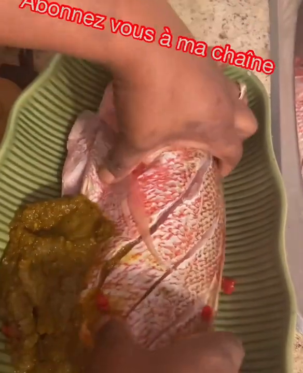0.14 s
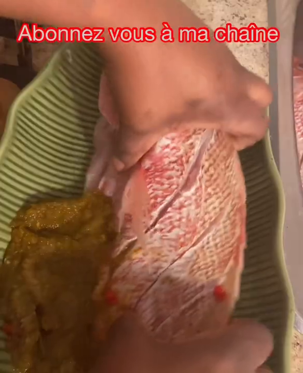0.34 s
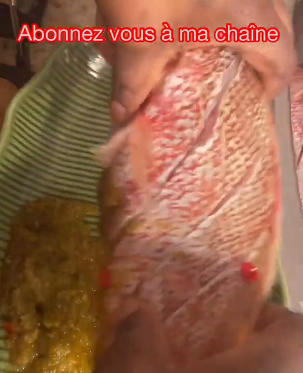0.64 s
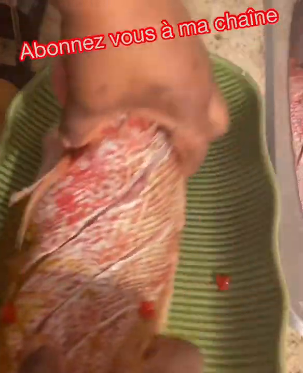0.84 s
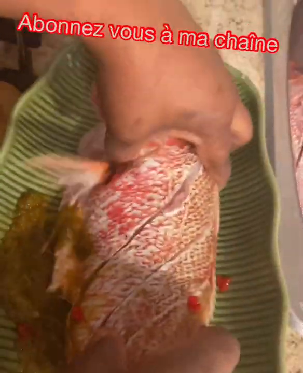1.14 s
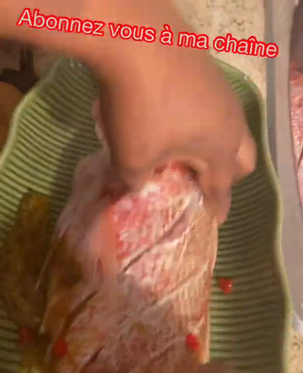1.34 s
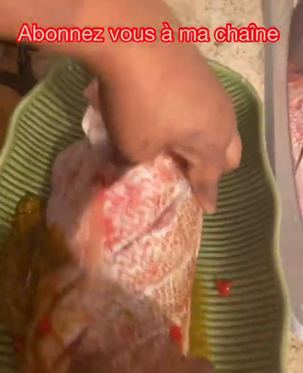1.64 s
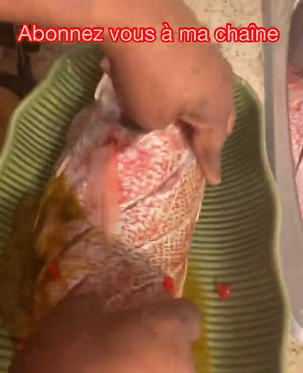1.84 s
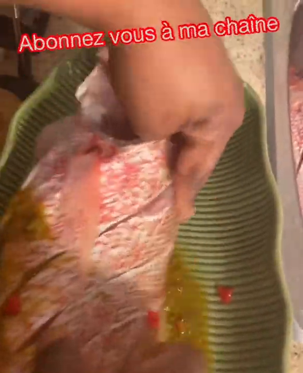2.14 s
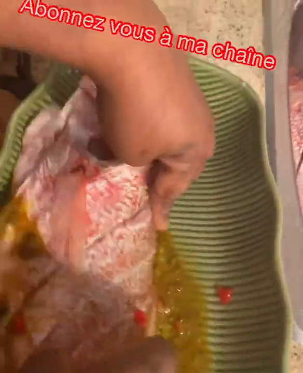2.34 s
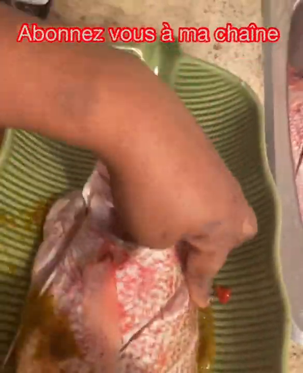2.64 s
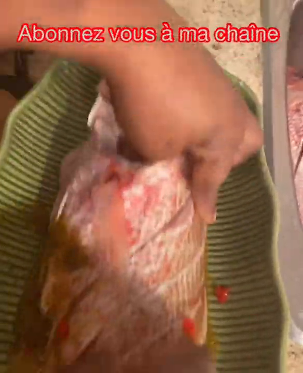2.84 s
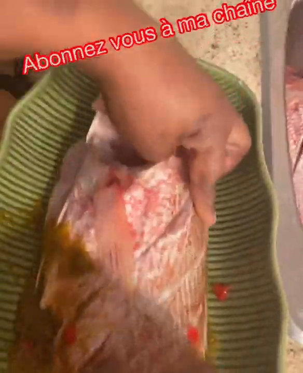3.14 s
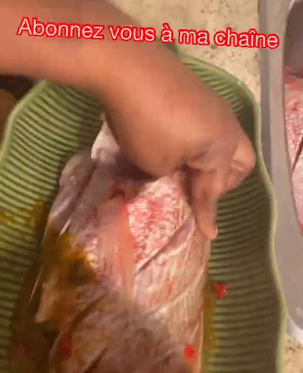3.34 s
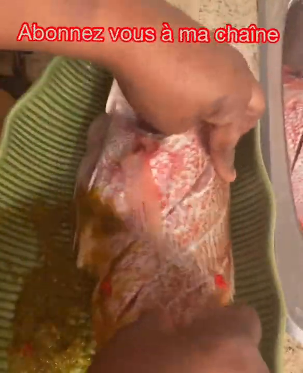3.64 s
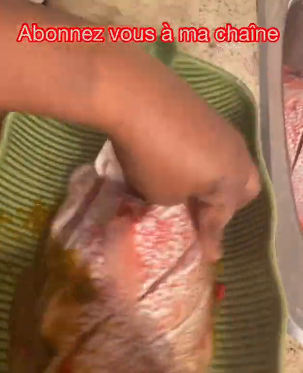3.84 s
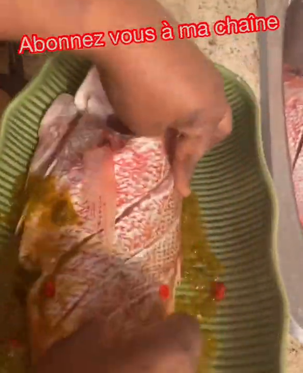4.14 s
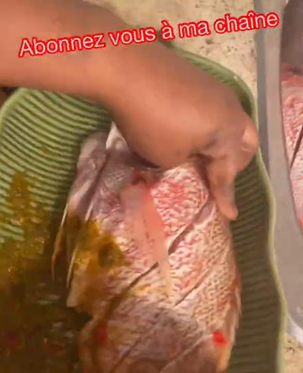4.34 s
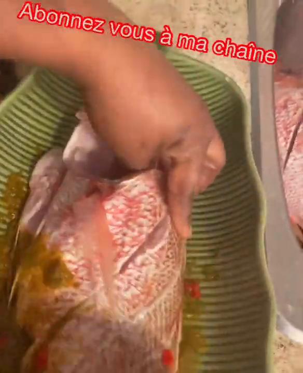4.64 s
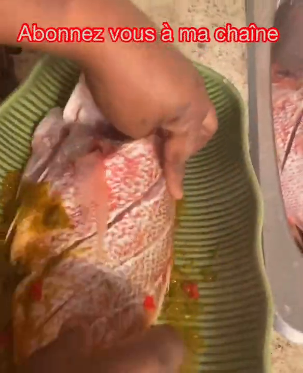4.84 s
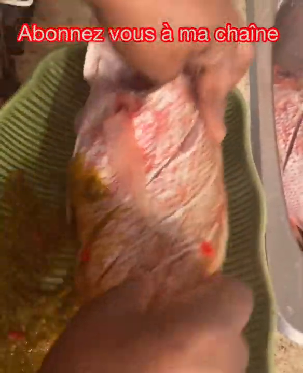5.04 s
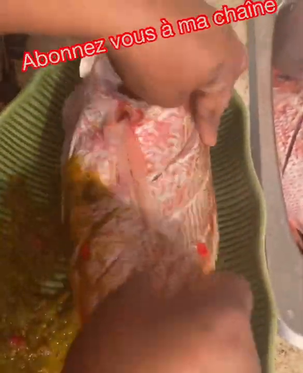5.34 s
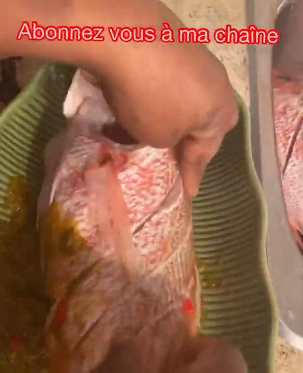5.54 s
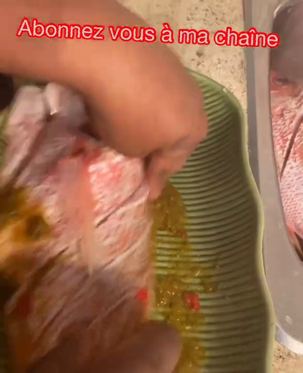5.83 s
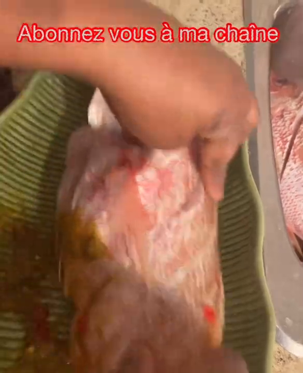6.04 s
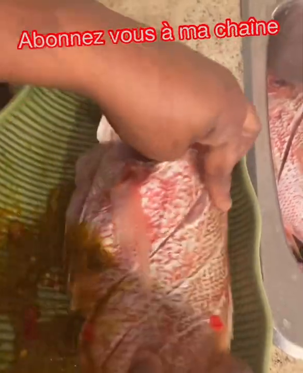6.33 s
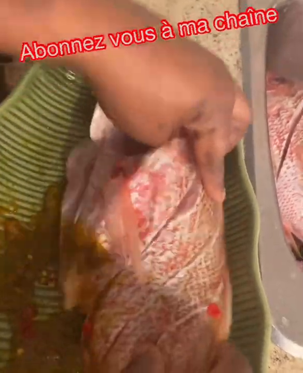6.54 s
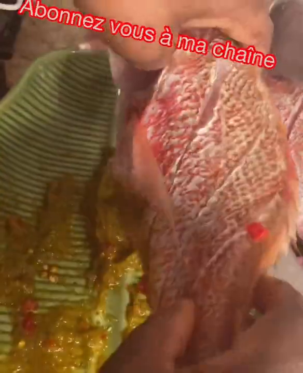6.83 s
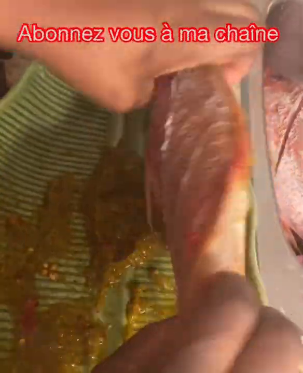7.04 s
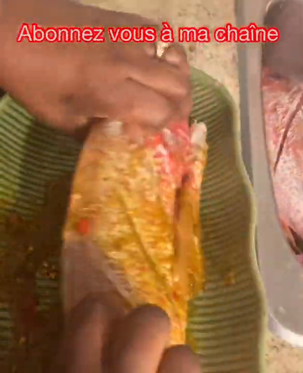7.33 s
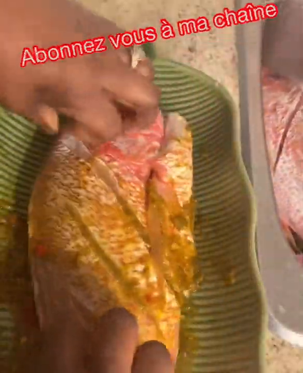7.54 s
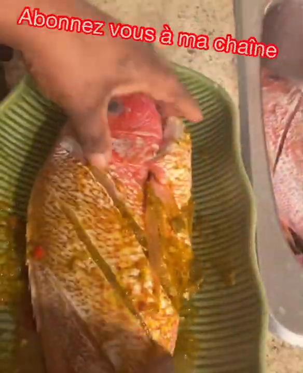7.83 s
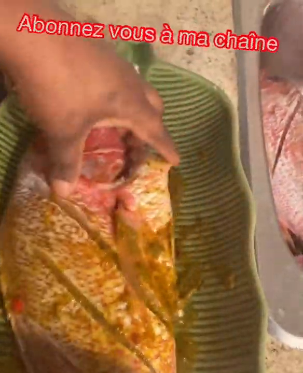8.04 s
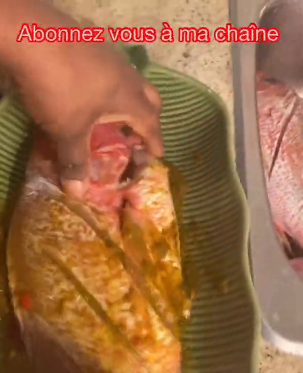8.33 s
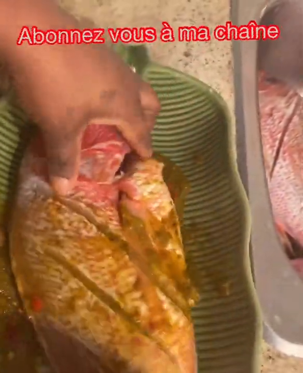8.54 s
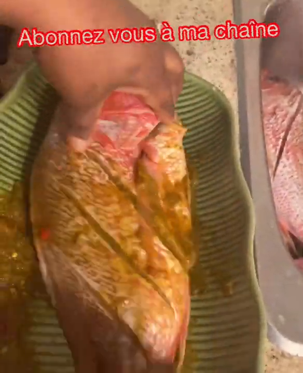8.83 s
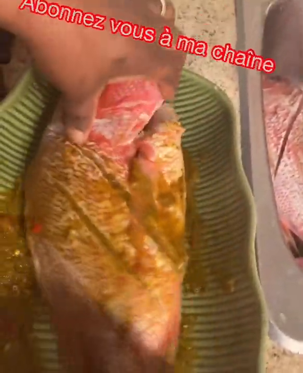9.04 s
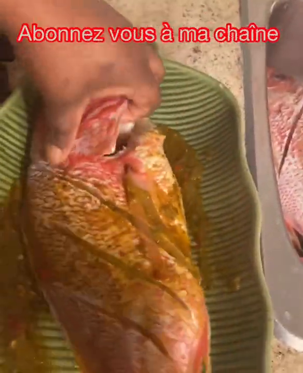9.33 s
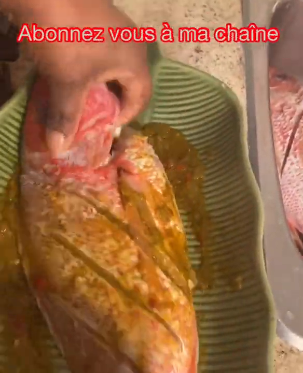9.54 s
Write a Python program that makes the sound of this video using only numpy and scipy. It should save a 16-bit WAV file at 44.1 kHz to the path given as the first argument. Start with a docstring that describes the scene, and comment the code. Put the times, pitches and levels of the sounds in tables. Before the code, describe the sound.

Close wet smacks and tiny rising pops of sticky paste, a few soft heavy thuds on a tray, over faint steady appliance hum.

```python
"""Raw fish pressed into seasoning paste

Hands press a scored fish into wet paste on a ribbed plastic tray in a kitchen. Air pockets pop as
short rising rings with noise bursts; peeling, sliding and squelching are clicks and noise through
resonances. Thuds ring the tray; steady tones hum over a dull noise rumble. Two close microphone ports
hear it all, with near echoes and a kitchen tail."""
import sys
import numpy as np
from scipy import signal
from scipy.fft import rfft, irfft, next_fast_len
from scipy.io import wavfile

SR = 44100
rng = np.random.default_rng(int(sys.argv[2]) if len(sys.argv) > 2 else 0)


def to_wav(sig):
    """Store sig (one row per channel, or 1-D mono) as 16-bit WAV at the path in sys.argv[1].

    Samples outside -1..1 are clipped; the rate is SR.
    """
    pcm = np.clip(np.atleast_2d(sig), -1, 1) * 32767
    pcm = np.round(pcm).astype(np.int16)
    wavfile.write(sys.argv[1], SR, pcm.T)  # frames by channels


N = 426447
SIZE = next_fast_len(N + SR)
HZ = np.arange(SIZE // 2 + 1) * SR / SIZE + 1e-3   # offset keeps log and division finite

# Patches of paste peeling off the tray. Each row: start in seconds, relative level in dB,
# length in seconds, brightness in dB per octave, level of the sizzle left behind in dB.
PEELS = [(1.306, -35.5, 0.033, 1, -68), (1.759, -36.5, 0.046, 0.5, -61), (1.87, -50.5, 0.021, -2, -60.5),
         (2.15, -37, 0.052, -4.5, -56), (2.517, -51, 0.067, -6, -91), (2.85, -52.5, 0.032, 4.5, -68),
         (3.728, -54, 0.056, -1, -81), (4.237, -20.5, 0.011, -3, -65), (4.391, -38.5, 0.024, -3.5, -62),
         (4.463, -39, 0.043, -5, -69), (5.12, -37, 0.031, -0.5, -69), (5.32, -39.5, 0.047, -6, -64),
         (5.335, -17, 0.017, 0.5, -44.5), (5.645, -30.5, 0.061, -0.5, -42.5), (6.023, -47.5, 0.14, 2, -50),
         (6.052, -45, 0.0058, -4.5, -57), (6.342, -34.5, 0.037, -3.5, -47), (7.517, -56, 0.068, -13, -96), ]


def from_db(db):
    """Decibels to an amplitude factor."""
    return 10 ** (np.asarray(db) / 20)


def rms_one(x):
    """Scales to unit rms."""
    return x / np.sqrt(np.mean(x ** 2) + 1e-20)


def at_hz(points, hz):
    """Interpolates (Hz, value) rows over log frequency."""
    points = np.array(points)
    return np.interp(np.log(hz), np.log(points[:, 0]), points[:, 1])


def add(out, start_s, piece):
    """Mixes a short sound in at a time."""
    i = round(start_s * SR)
    out[i:i + len(piece)] += piece[:N - i]


def band_filter(order, low_hz, high_hz):
    """Butterworth band-pass sections."""
    return signal.butter(order, [low_hz, high_hz], "band", fs=SR, output="sos")


def drift(rate_hz):
    """Slow random curve of unit rms: low-passed noise, computed every 40 samples."""
    r = np.exp(-80 * np.pi * rate_hz / SR)
    noise = rng.standard_normal(N // 40 + 2002)
    slow = signal.lfilter([1], [1, -2 * r, r * r], noise)[2000:]   # drops the filter's start-up
    return np.interp(np.arange(N) / 40, np.arange(len(slow)), rms_one(slow))


def ring(clicks, hz, t60_s):
    """Two-pole resonance: a unit click starts a decaying sine of height 1."""
    r = from_db(-60 / (t60_s * SR))
    w = 2 * np.pi * hz / SR
    return signal.lfilter([0, np.sin(w)], [1, -2 * r * np.cos(w), r * r], clicks + 1e-18)


def chance_clicks(per_s, spread_db):
    """Clicks at random moments, sizes of a long-tailed spread; mean power about 1."""
    sizes_db = spread_db * np.minimum(rng.exponential(1, N), 5)
    sizes = rms_one(from_db(sizes_db) * rng.choice([-1, 1], N))
    return sizes * (rng.random(N) < per_s / SR) * np.sqrt(SR / per_s)


def snaps(clicks, tilt_db, cycles, patchy_db, low_hz):
    """Clicks are dealt to pockets of 18 pitches; each swells and rings, and like sizes come and go together.

    tilt_db is in dB per octave."""
    pitches_hz = np.geomspace(low_hz, 15000, 18)
    dealt = rng.integers(0, 18, N)
    patches = [drift(19) for _ in range(6)]
    out = 0
    for k, hz in enumerate(pitches_hz):
        t60_s = cycles / hz
        once = ring(clicks * (dealt == k), hz, t60_s)
        pocket = ring(once, hz, t60_s) * (hz / cycles / SR) ** 1.461   # second ring gives the swell
        level_db = tilt_db * np.log2(hz / 4000) + patchy_db * patches[k // 3] + 30.5
        out = out + from_db(level_db) * pocket
    return out


def diffuse(pair):
    """Two unrelated spectra become left and right, with a set correlation at each pitch."""
    # Each row: frequency in Hz, left-right correlation from 0 to 1.
    likeness = [(60, 0.93), (250, 0.82), (600, 0.037), (2000, 0.4), (5000, 0.16), (10000, 0.88)]
    alike = np.clip(at_hz(likeness, HZ), 0, 1)
    common = np.sqrt(1 + alike) * pair[0]
    opposed = np.sqrt(1 - alike) * pair[1] * [[1], [-1]]
    return irfft((common + opposed) / np.sqrt(2), SIZE)[:, :N]


def rumble():
    """Steady room noise, heavy in the bass."""
    # Spectrum shape. Each row: frequency in Hz, relative density in dB.
    spectrum = [(15, -46), (25, 6), (118, -10.5), (167, -8.5), (368, -12.5), (651, -23), (1930, -37),
                (2460, -47.5), (7110, -65), (9080, -58.5), (10700, -53.5), (13300, -62), (15200, -47),
                (16500, -77.5)]
    noise = rfft(rng.standard_normal((2, SIZE))) * from_db(at_hz(spectrum, HZ))
    return from_db(-46.5) * rms_one(diffuse(noise))


def hum(waver_db, waver_hz):
    """Appliance motor tones that waver a little in level and pitch."""
    # Each row: frequency in Hz, rms level in dB, both before waver.
    tones = [(59.2, -52.5), (86.1, -52.5), (118.4, -48.5), (355.3, -64)]
    out = 0
    for hz, db in tones:
        level = np.sqrt(2) * from_db(db + waver_db * drift(2.9))
        cycles = np.cumsum(hz + waver_hz * drift(3.07)) / SR
        out = out + level * np.sin(2 * np.pi * cycles)
    return out


def kitchen(x, gap_s):
    """Echo tail: noise in octave bands, each with its own decay, from the first wall echo on."""
    # Each row: frequency in Hz, decay time t60 in seconds.
    room_t60 = [(100, 0.52), (1000, 0.26), (4000, 0.21), (12000, 0.14)]
    t = np.arange(SR // 2) / SR
    tail = 0
    white = rng.standard_normal((2, len(t)))
    for low_hz in 60 * 2. ** np.arange(8):
        octave = signal.sosfilt(band_filter(2, low_hz, 2 * low_hz), white)
        tail = tail + octave * from_db(-60 * t / at_hz(room_t60, low_hz * np.sqrt(2)))
    tail = tail * (t > gap_s) / np.sqrt(np.sum(tail ** 2) / 2)
    return diffuse(rfft(tail, SIZE) * rfft(x, SIZE))


def near_echoes(x, level_db, t60_s):
    """Hands and tray ribs throw back brief dense echoes, opposite in sign at the two ports."""
    t = np.arange(SR // 30) / SR
    echoes = rng.standard_normal(len(t)) * from_db(-60 * t / t60_s)
    echoes = signal.sosfilt(band_filter(3, 450, 6000), echoes)
    echoes = from_db(level_db) * echoes / np.sqrt(np.sum(echoes ** 2))
    return signal.fftconvolve(echoes, x)[:N] * [[1], [-1]]


def scrapes():
    """Slow strokes of skin over the ribs: lumpy band noise that swells, climbs in pitch and fades."""
    # Each row: start in seconds, level in dB, starting centre in Hz, length in seconds.
    strokes = [(8.241, -65, 2260, 0.22), (8.508, -68, 2400, 0.2)]
    climb, grain_db = 0.3, 3.0   # share of pitch gained over a stroke; unevenness
    out = np.zeros(N)
    for start_s, db, hz, length_s in strokes:
        part = np.arange(round(length_s * SR)) / (length_s * SR)
        band = band_filter(2, hz / np.sqrt(2), hz * np.sqrt(2))
        noise = rms_one(signal.sosfilt(band, rng.standard_normal(N // 4)))
        read_at = len(part) * part * (1 + climb * part / 2)   # ever faster reading lifts the pitch
        noise = np.interp(read_at, np.arange(len(noise)), noise)
        add(out, start_s, from_db(db) * noise * np.sin(np.pi * part))
    return out * from_db(grain_db * drift(30))


def slide_db(s):
    """Relative level of the fish sliding in the paste at given times."""
    # Each row: time in seconds, relative level in dB.
    slide = [(0.0, -70.5), (0.48, -69), (0.75, -103), (0.91, -67.5), (1.55, -73), (2.15, -77.5),
             (2.39, -67), (2.94, -77.5), (3.85, -68), (4.47, -69.5), (5.25, -74.5), (5.57, -69),
             (6.27, -68), (6.68, -81.5), (7.46, -67), (8.0, -71.5), (8.54, -70.5), (9.67, -69.5)]
    return np.interp(s, *np.transpose(slide))


def tearing(per_s, spread_db, cycles, clump_db, click_db, swish_db, grain_db):
    """Smear of wet friction with small films snapping in clumps; flares after each peel, then dies away."""
    tilt_db = -3   # per octave
    rise_s, sizzle_t60_s = 0.016, 0.38   # stretched films go on tearing after each patch
    level = from_db(slide_db(np.arange(N) / SR))
    t = np.arange(SR // 2) / SR
    for start_s, *_, sizzle_db in PEELS:
        flare = from_db(sizzle_db - 60 * t / sizzle_t60_s)
        add(level, start_s, flare * np.minimum(t / rise_s, 1) ** 2)
    clicks = chance_clicks(per_s, spread_db) * from_db(click_db + clump_db * drift(10))
    smear = from_db(swish_db * drift(2.1) + grain_db * drift(34)) * rng.standard_normal(N)
    return snaps(level * (clicks + smear), tilt_db, cycles, patchy_db=6.0, low_hz=1090)


def squelches(width, tail, sag_per_s):
    """Air squeezed through a wet gap: one cavity resonance, part breathy, part clear; fast swell, then fade."""
    # Each row: start in seconds, level in dB, cavity in Hz, fade time in seconds, clearness 0 to 1.
    gaps = [(0.063, -53, 1855, 0.012, 0.44), (0.457, -49.5, 1190, 0.031, 0.1),
            (1.571, -44, 1790, 0.015, 0.18), (1.94, -51, 1410, 0.041, 0.2),
            (2.154, -35.5, 1448, 0.029, 0.54), (2.153, -33.5, 3970, 0.025, 0.66),
            (2.155, -38.5, 2800, 0.019, 0.3), (2.156, -37.5, 898, 0.017, 0.7),
            (2.157, -44.5, 2270, 0.036, 0.7), (2.2, -55, 3060, 0.057, 0.3), (2.747, -52, 1530, 0.027, 0.37),
            (4.474, -25.5, 496, 0.0088, 0.55), (4.489, -46, 2740, 0.016, 0.6),
            (5.137, -38.5, 1490, 0.024, 1), (5.133, -46.5, 2130, 0.054, 0.3),
            (5.341, -12.5, 540, 0.0036, 0.88), (6.075, -34.5, 973, 0.01, 0.5),
            (6.355, -28, 918, 0.0098, 0.04), (7.066, -43, 1440, 0.041, 0.33),
            (7.09, -49.5, 1775, 0.024, 0.18), (7.212, -39.5, 1696, 0.012, 0.5),
            (7.213, -63, 3450, 0.019, .3), (9.074, -52, 1960, 0.012, 0.3), (9.406, -57, 2760, 0.014, .5),
            (9.441, -54.5, 1500, 0.012, 0)]
    out = np.zeros(N)
    t = np.arange(SR // 5) / SR
    noises = rng.standard_normal((len(gaps), len(t)))
    for (start_s, db, hz, fade_s, clear), noise in zip(gaps, noises):
        t60_s = 2.4 / (width * hz)
        breath = rms_one(ring(ring(noise, hz, t60_s), hz, t60_s))
        clear = np.clip(clear, 0, 1)
        cavity = (1 - clear) * breath + clear * np.sqrt(2) * np.sin(2 * np.pi * hz * t)
        cavity = np.interp(t * (1 - sag_per_s * t), t, cavity)   # the gap widens, the pitch sags
        envelope = np.minimum(t / 0.0028, 1) * np.exp(-(t / fade_s) ** tail)
        add(out, start_s, from_db(db) * cavity * envelope)
    return out


def rips(per_s, spread_db, cycles):
    """A broad patch of paste peels off the tray at once: a dense, ragged run of snaps."""
    level, tilt_db = np.zeros(N), np.zeros(N)
    for start_s, db, length_s, row_tilt_db, _ in PEELS:
        part = np.arange(round(length_s * SR)) / (length_s * SR)
        add(level, start_s, from_db(db) * np.sqrt(np.sin(np.pi * part ** 0.22)))
        tilt_db[round(start_s * SR):] = row_tilt_db   # holds until the next patch
    clicks = level * chance_clicks(per_s, spread_db)
    return snaps(clicks, tilt_db, cycles, patchy_db=6.0, low_hz=1390) * from_db(-1.5)


def thuds(push_db, modes_db, slap_db):
    """A soft blow rings the flesh-damped tray; bending waves bring highs first, so each thud falls in pitch."""
    # The fish dropping or shifting. Each row: time in seconds, level in dB,
    # contact hardness in Hz, damping t60 in seconds.
    blows = [(.911, -24, 2150, 0.042), (.926, -12, 587, 0.079), (.966, -15, 617, 0.15),
             (2.21, -17, 240, 0.27), (2.252, -11, 644, 0.11), (2.282, -10, 170, 0.11),
             (3.999, -24.5, 150, 0.44), (4.045, -24, 272, 0.2), (4.083, -20.5, 194, 0.067),
             (4.722, -17.5, 146, 0.071), (5.744, -5.5, 930, 0.11), (5.789, -24, 497, 0.24),
             (9.384, -11.5, 119, 0.095), (9.565, -9, 700, 0.11)]
    # Tray modes. Each row: frequency in Hz, relative level in dB, t60 in seconds before damping.
    modes = [(118.6, 4.5, 0.71), (157, -1, 0.39), (231.5, -7, 1), (291.7, -1, 1), (375.2, -2, 0.14),
             (932, -6.5, 1)]
    spread = 0.1892   # travel time in s = spread / sqrt(Hz)
    out = np.zeros(N)
    t = np.arange(SR // 2) / SR
    hz = np.fft.rfftfreq(SR, 1 / SR)
    lead_s = spread / np.sqrt(1500)   # a row's time is that of the 1500 Hz arrival
    travel = np.exp(-2j * np.pi * (2 * spread * np.sqrt(hz) - lead_s * hz))
    chance = rng.standard_normal((len(blows), len(modes) + len(t)))
    for (start_s, db, hard_hz, damped_s), row in zip(blows, chance):
        body = from_db(slap_db) * row[len(modes):]   # wet flesh settling down
        for (mode_hz, level_db, t60_s), luck in zip(modes, row):
            decay = from_db(level_db + modes_db + 2 * luck - 60 * t / t60_s)
            body += decay * np.sin(2 * np.pi * mode_hz * t)
        body *= from_db(-60 * t / damped_s)
        body[0] += from_db(push_db) * SR / hard_hz   # the push itself
        soft = 1 / (1 + (hz / hard_hz) ** 2) / (1 + (hz / hard_hz / 5) ** 4)
        soft = soft / (1 + (hz / 2400) ** 6) / (1 + (95 / (hz + 1)) ** 6)
        add(out, start_s, from_db(db) * irfft(rfft(body, SR) * soft * travel)[:len(t)])
    return out


def faint_pops():
    """Pop rows at random times and pitches, as strong as the sliding makes them."""
    per_s, low_hz, high_hz = 10, 1490, 9700
    over_slide_db, spread_db, mean_tick_db = 9, 5, -11
    when, size, pitch, tick = rng.random((round(per_s * N / SR), 4)).T
    start_s = when * N / SR
    db = slide_db(start_s) + over_slide_db - spread_db * np.log(1 - .99 * size)
    hz = low_hz * (high_hz / low_hz) ** pitch
    return list(zip(start_s, db, hz, mean_tick_db + 20 * (tick - .5)))


def pops(cycles, rise_cycles, splash_db, splash_t60_s, tick_t60_s):
    """Each pocket swells, rings with rising pitch and lingers; its bursting film adds a tick and a splash."""
    # The clearest pops. Each row: start in seconds, level in dB, pocket pitch in Hz,
    # bright tick in dB relative to the row's level.
    clear_pops = [(0.003, -42.5, 3660, -12), (0.0548, -27, 8650, 2.5), (0.1118, -39.5, 7950, 8),
                  (0.1578, -39, 3280, 0), (0.2049, -45, 10060, -20), (0.2968, -41.5, 4660, -14),
                  (0.3202, -44, 3350, 0), (0.3772, -44, 1830, 5.5), (0.7218, -46.5, 3860, 8.5),
                  (0.7513, -42, 2670, 3), (0.8759, -40.5, 6700, -4), (1.0606, -45.5, 8850, 16.5),
                  (1.2676, -29.5, 9000, -5), (1.3178, -18.5, 4560, 7), (1.3216, -20, 3030, -25),
                  (1.5069, -41, 5100, 12), (1.5251, -37, 5100, 6), (1.539, -35.5, 3700, -25),
                  (1.5585, -29.5, 4740, -4), (1.7619, -25.5, 2410, -15), (1.7715, -28.5, 6150, -10),
                  (1.9157, -31, 1490, -23), (1.939, -35.5, 7400, -16), (1.9669, -35, 11200, -2),
                  (2.1544, -19, 4600, 3), (2.1867, -22.5, 4650, 8), (2.2608, -35.5, 9700, 2),
                  (2.305, -46.5, 3500, -20), (2.3825, -41, 7150, -8), (2.5257, -25, 3670, 2),
                  (2.5528, -18.5, 8070, -28), (3.1074, -29.5, 4560, -2), (3.1433, -37, 11800, -8),
                  (3.2483, -40, 13500, -16), (3.6001, -39.5, 1460, -24), (3.7092, -55, 5250, 0),
                  (3.7282, -36, 5460, 9), (3.743, -19, 5140, -3), (3.8743, -35, 8100, -14),
                  (4.0093, -45, 3820, 11), (4.2193, -29, 2030, -9), (4.2258, -30, 6600, 1),
                  (4.2393, -23.5, 4560, -11), (4.2396, -21, 1990, 8.5), (4.3925, -30, 2100, -15),
                  (4.3921, -27.5, 4770, -28), (4.4063, -33, 2020, -23), (4.4735, -23, 1330, -20),
                  (4.474, -20.5, 2170, 8), (4.4865, -28.5, 2200, 6), (4.555, -45, 5000, -8),
                  (4.6112, -34, 3140, -8), (4.6114, -37.5, 1280, -20), (4.626, -38, 7800, -7),
                  (4.656, -36, 1640, -30), (4.679, -37, 2400, -37), (4.6946, -34, 6430, 3),
                  (4.7125, -37, 4800, 9), (4.9402, -42, 7340, 8.5), (5.122, -32.5, 2250, -7),
                  (5.1305, -20, 1830, 3), (5.3358, -6.5, 2190, -13.5), (5.3402, -4.5, 4910, 4.5),
                  (5.3466, -20.5, 4500, -6), (5.4368, -23, 3170, -28), (5.45, -35.5, 1800, -20),
                  (5.649, -19.5, 4200, -27), (5.6622, -13, 8430, 3.5), (5.6728, -14.5, 3110, -12),
                  (5.7453, -27, 3400, -16), (5.8084, -33.5, 2650, 4), (5.9236, -35, 3550, -34.5),
                  (6.0398, -22.5, 3930, 0), (6.056, -13.5, 2300, 8.5), (6.0614, -12, 6270, -6),
                  (6.0848, -21.5, 1950, -22), (6.0977, -23.5, 4980, -17), (6.1629, -40.5, 6030, -10),
                  (6.347, -16, 5040, 4), (6.3596, -12, 1834, -20), (6.4542, -36, 7570, 6),
                  (7.0449, -40, 7800, 3), (7.212, -49, 5020, -14), (7.296, -49, 3100, -12),
                  (7.3139, -42, 6500, 7.5), (7.5572, -32, 8050, 4.5), (7.5662, -29, 3750, -30),
                  (7.7483, -40, 11100, -1), (7.845, -36, 8500, -13), (8.259, -42.5, 2074, 0),
                  (8.3662, -37.5, 1950, -31), (8.3665, -46, 3400, -20), (8.4263, -47, 8380, 12),
                  (8.4771, -45, 7350, -6), (8.5016, -41, 11750, -12), (8.6056, -52, 4400, -15),
                  (8.7143, -42.5, 2080, 11.5), (8.876, -41.5, 1870, -6), (8.9694, -40.5, 1850, 1),
                  (9.0665, -36, 2540, -26.5), (9.0969, -31.5, 9400, -10), (9.1182, -44.5, 3440, 11),
                  (9.1396, -42.5, 2060, 10), (9.206, -38.5, 3960, 4), (9.307, -43, 3100, -4),
                  (9.398, -45, 1750, -20), (9.3991, -27.5, 6470, -38), (9.641, -31, 9500, -30)]
    linger_db, linger_t60_s, linger_spread_db = -18.5, .045, 2   # the emptied pocket rings on faintly
    crack_db = -2.5   # sharp snap at the start of the tick, re the tick
    out = np.zeros(N)
    t = np.arange(SR // 18) / SR
    rows = clear_pops + faint_pops()
    noise = rng.standard_normal((len(rows), 2, len(t)))
    bright = band_filter(2, 5500, 13000)
    click = 1. * (np.arange(len(t)) == SR // 1000)   # 1 ms in
    snap = signal.sosfilt(band_filter(2, 1700, 14000), click)
    for (start_s, db, hz, tick_db), (hiss, spray) in zip(rows, noise):
        swell = 1 - np.exp(-(t * hz / max(rise_cycles, 1)) ** 2)
        rising = np.sin(2 * np.pi * hz * t * (1 + 0.0013 * hz * t))
        tone = rising * from_db(6.0 - 60 * t * hz / cycles) * swell
        fade = from_db(linger_db + linger_spread_db * hiss[0] - 60 * t / linger_t60_s)
        tone += np.sin(2 * np.pi * hz * 1.03 * t) * fade * swell
        burst = hiss * np.minimum(t / 0.0023, 1) * from_db(-60 * t / tick_t60_s)
        tick = from_db(tick_db) * signal.sosfilt(bright, burst)
        tick += from_db(tick_db + crack_db) * snap
        wide = band_filter(2, hz / 1.354, min(hz * 1.58, 16000))
        spray_fade = from_db(-60 * t / splash_t60_s * np.sqrt(max(hz / 4000, 1)))   # faster when high
        splash = from_db(splash_db) * signal.sosfilt(wide, spray * swell * spray_fade)
        add(out, start_s, from_db(db) * (tone + tick + splash))
    return out


def scene():
    """Paste and tray sounds, their echoes, and the background."""
    paste = pops(cycles=13.76, rise_cycles=1.62, splash_db=-11.0, splash_t60_s=0.066, tick_t60_s=0.0085)
    paste = paste + rips(per_s=4500, spread_db=4.5, cycles=4.1)
    paste = paste + squelches(width=0.094, tail=1.4, sag_per_s=0.12)
    paste = paste + tearing(per_s=150, spread_db=-0.5, cycles=2.4, clump_db=5.5, click_db=-6.5,
                            swish_db=0.0, grain_db=2.5)
    paste = paste + scrapes()
    tray = thuds(push_db=-19.0, modes_db=-7.5, slap_db=1.7)
    near = near_echoes(paste + tray, level_db=-9.0, t60_s=0.11)
    room = kitchen(from_db(-10.5) * paste + from_db(-7.0) * tray, gap_s=0.0026)
    return paste + tray + near + room + hum(waver_db=2.5, waver_hz=0.88) + rumble()


def record(dry):
    """The ports differ in level and treble phase; bass is cut, peaks are rounded, the top is cut."""
    # Each row: frequency in Hz, left minus right in dB.
    balance = [(60, 3), (240, -1), (950, 0), (3770, 3), (15000, -1)]
    lag_s, lag_from_hz = .000222, 6750   # treble reaches the left port later
    phase = 2 * np.pi * lag_s * np.maximum(HZ - lag_from_hz, 0)
    half = from_db(at_hz(balance, HZ) / 2) * np.exp(-.5j * phase)
    bass_cut = 1 / (1 + (44 / HZ) ** 6)
    ports = irfft(rfft(dry, SIZE) * [half, 1 / half] * bass_cut, SIZE)[:, :N]
    rounded = .85 * np.tanh(ports / .85)
    return signal.sosfilt(signal.cheby2(14, 80, 16700, fs=SR, output="sos"), rounded)


dry = scene()
out = record(dry)
to_wav(out)
```